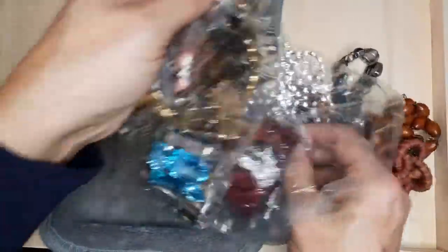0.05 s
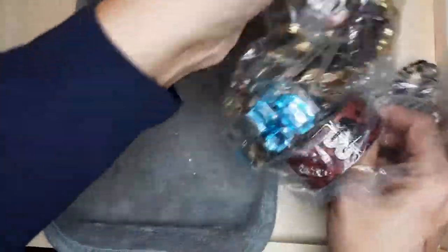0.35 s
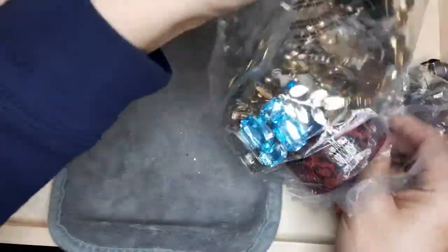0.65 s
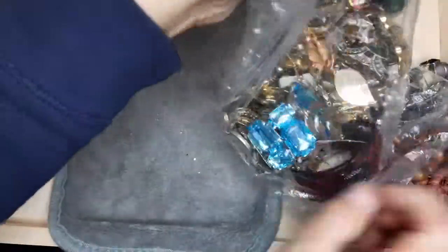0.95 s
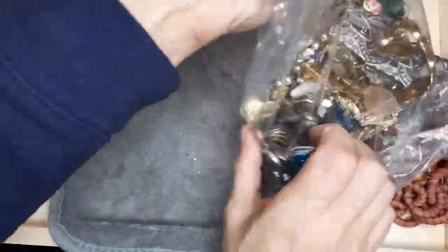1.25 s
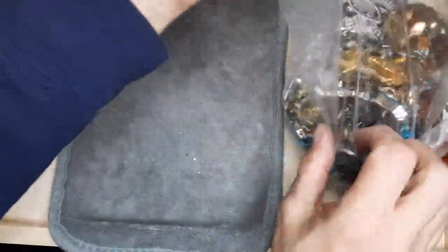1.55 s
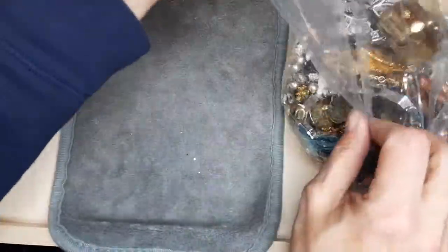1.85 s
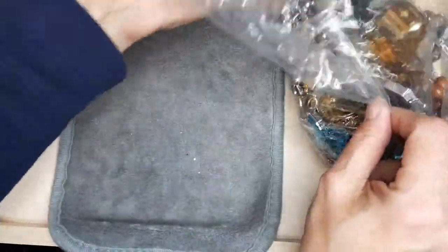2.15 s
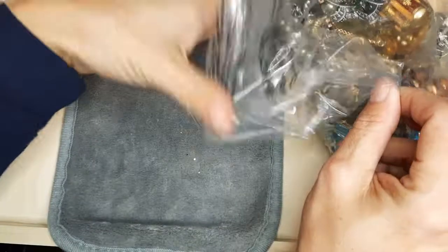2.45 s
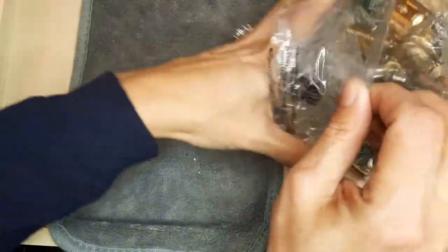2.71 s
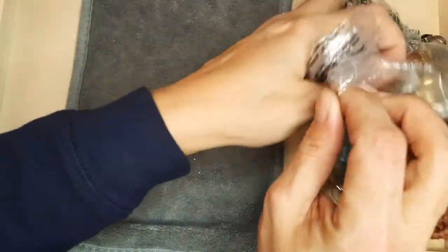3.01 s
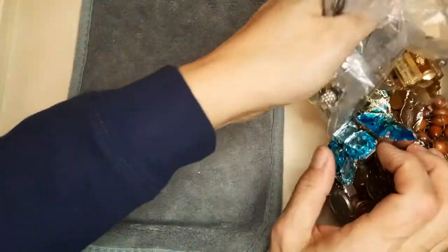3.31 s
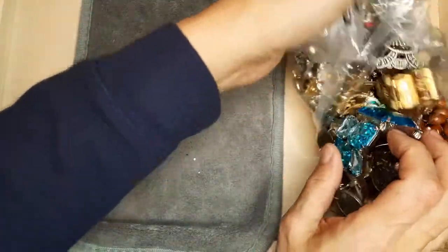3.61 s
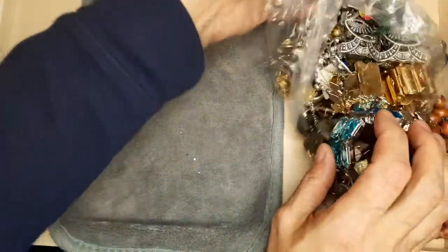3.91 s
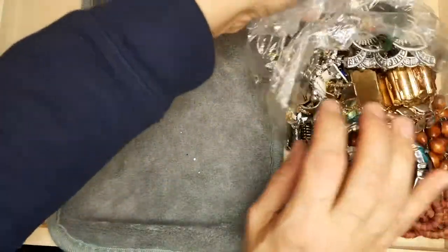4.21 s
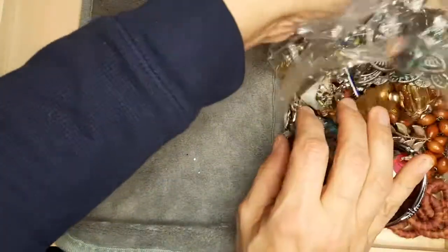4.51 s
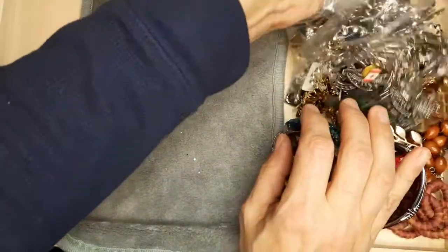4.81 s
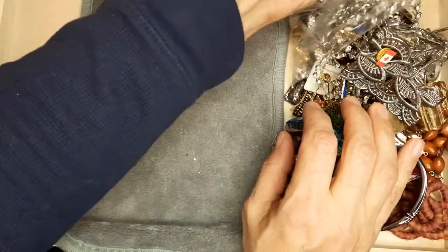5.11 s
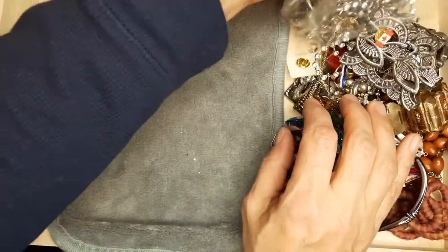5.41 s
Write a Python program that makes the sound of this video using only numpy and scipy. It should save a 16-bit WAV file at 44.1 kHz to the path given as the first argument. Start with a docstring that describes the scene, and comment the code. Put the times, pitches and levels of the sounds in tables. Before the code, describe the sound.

Costume jewellery is worked out of a thin plastic bag onto a wooden tray. The bag crinkles and snaps with each tug while beads and brooches grind and clack together. After a quieter stretch the crackling picks up, chains spill out with a fine, high jingle, and the heap settles with a louder clatter and dull knocks. The microphone is close, in a small, quiet room.

```python
"""In a small room, close to a phone, costume jewellery is worked out of a plastic bag onto a wooden tray.
Each tug buckles the thin plastic in many tiny spots, so it crinkles, and its creases snap.
Beads and brooches grind, rattle and clack against each other, and the tray answers with a dull knock.
Fine metal links ring high above the rest, and later on chains spill out and jingle."""
import sys
import numpy as np
from scipy import signal
from scipy.fft import rfft, irfft
from scipy.io import wavfile
from scipy.ndimage import uniform_filter1d

SR = 44100
rng = np.random.default_rng(int(sys.argv[2]) if len(sys.argv) > 2 else 0)


def transcribe(signal):
    """Save signal, clipped to [-1, 1], as a 16-bit WAV file at the path in sys.argv[1]."""
    frames = np.atleast_2d(signal).T
    limited = np.clip(frames, -1, 1)
    pcm = np.round(limited * 32767).astype(np.int16)
    wavfile.write(sys.argv[1], SR, pcm)


N = 245195

# A "ring time" (t60 in the code) is how long a sound takes to fade by 60 dB.
# the hush of the room: (pitch [Hz], level [dB])
AIR_TONE = [(20, -22), (45, -1), (68, -5), (120, -2.5), (300, -9.5), (1000, 0), (4000, -16.5),
            (15000, -53)]
# the heap settling on the table: (time [s], level [dB])
THUDS = [(.71, -55), (5.336, -47.5)]
# tugs at the bag: (start [s], length [s], crinkle [dB], grinding [dB], tray rumble [dB], sizzle [dB])
TUGS = [(-.12, 0.19, -40.5, -46, -52, -46), (0.05, .18, -40.5, -43, -54, -46.5),
        (0.236, 0.095, -38.5, -40.5, -49, -41.5), (0.285, 0.15, -44.5, -43.5, -52, -48),
        (0.593, 0.16, -38.5, -44, -50, -42.5), (0.795, 0.061, -51, -48, -60, -55),
        (0.93, 0.01, -44.5, -48.5, -58, -49), (0.51, 0.063, -51, -55.5, -64, -57),
        (1.008, 0.043, -49, -52, -56, -54), (1.111, 0.056, -41, -49, -55.5, -43.5),
        (1.215, 0.2, -46.5, -49.5, -56.5, -49), (1.481, 0.051, -43, -48, -76, -47),
        (1.682, 0.055, -49.5, -69, -84, -53), (1.565, 0.042, -50.5, -69, -73, -60),
        (1.76, .07, -55, -53, -69, -72), (1.934, 0.15, -43.5, -49, -53.5, -47.5),
        (2.105, 0.056, -48, -53.5, -57.5, -51.5), (2.29, 0.18, -51, -52, -60, -53.5),
        (2.67, .1, -55.5, -56, -59.5, -54.5), (2.58, 0.074, -51.5, -52, -55, -61),
        (2.764, 0.25, -43.5, -46, -52.5, -46.5), (3.043, 0.096, -45.5, -47, -56, -49),
        (3.268, 0.034, -51, -61, -81, -57), (3.37, .04, -52, -53, -72, -56),
        (3.439, 0.046, -45.5, -50.5, -59, -49.5), (3.475, 0.2, -45, -51, -55.5, -51),
        (3.721, 0.087, -47, -53, -55, -50.5), (3.817, 0.25, -44.5, -49, -52.5, -48.5),
        (4.07, 0.22, -50.5, -54, -57.5, -55), (4.358, 0.086, -43.5, -44, -52, -48.5),
        (4.446, 0.053, -39.5, -42, -49, -43.5), (4.523, 0.1, -46.5, -53, -52, -47.5),
        (4.636, 0.037, -46, -53, -58, -52), (4.682, 0.067, -50, -66, -74, -52),
        (4.973, 0.078, -52.5, -63, -62, -57), (4.626, 0.35, -45, -49, -54, -48.5),
        (5.077, 0.2, -49, -52, -51.5, -51.5), (5.274, 0.067, -35.5, -37, -41.5, -41.5),
        (5.404, 0.059, -53, -49, -61, -60)]
# tone of the tray, the heap, and the bag's crinkle, sizzle and sparkle: (pitch [Hz], level [dB])
TRAY_TONE = [(30, -32), (65, -5.5), (105, -10), (200, -4), (380, 1.5), (800, -2.5), (1100, 0), (1800, -40)]
HEAP_TONE = [(400, -22), (900, -6), (1300, -1.5), (2300, 3.5), (3300, 1), (4300, -6), (7000, -26),
             (15000, -43)]
CRINKLE_TONE = [(2000, -30.5), (3600, 1), (4400, 2.5), (5100, -2.5), (6200, -0.5), (7600, 0.5), (9000, 1),
                (10500, -9.5), (14000, -43.5)]
SIZZLE_TONE = [(6500, -28), (9000, -4.5), (10000, 1.5), (11200, 5.5), (12600, 3), (13800, -14),
               (15800, -33.5)]
SPARKLE_TONE = [(11000, -32), (13300, -1), (14300, 7), (15000, -5), (15800, -1)]
# pitches that stand out in the rustle and hits, low woody ones and two bright bands:
# (pitch [Hz], width [Hz], level [dB])
STANDOUT_PITCHES = [(180, 34, -9), (300, 20, -19), (409, 11, -16), (793, 94, -11), (1270, 170, -10.5),
                    (1836, 58, -9), (2520, 990, -20.5), (3330, 250, -12.5), (6120, 1000, -8),
                    (11000, 880, -21)]
# pieces chattering as they slide: (start [s], length [s], pitch [Hz], level [dB], pitch spread [share])
RATTLES = [(0.35, 0.037, 2470, -37.5, 0.22), (0.404, .015, 1396, -35, 0.28), (.49, 0.07, 11400, -55, 0.017),
           (0.709, 0.033, 4550, -37.5, 0.073), (1.322, 0.036, 11300, -47.5, .01),
           (1.49, 0.051, 11400, -49, 0.0082), (2.085, 0.045, 12160, -57, .008),
           (1.51, 0.055, 4630, -47.5, 0.14), (1.968, 0.11, 4460, -49, 0.114),
           (2.081, 0.094, 4270, -47, 0.126), (3.07, .1, 6150, -47.5, 0.03), (3.59, .006, 4720, -45, .1),
           (3.651, .003, 5000, -41, 0.047), (3.709, .007, 4850, -39, 0.13), (4.037, 0.04, 915, -42, 0.4),
           (4.033, 0.048, 8800, -48, .07), (4.154, 0.23, 1140, -49, 0.32), (4.353, 0.02, 6120, -43, 0.047),
           (4.478, 0.026, 8850, -40, .06), (4.87, 0.04, 12300, -45, 0.056), (4.922, .018, 12200, -41, .03)]
# small metal parts ringing freely: (time [s], pitch [Hz], level [dB], ring time [s])
TINKLES = [(0.837, 5930, -27, 0.044), (1.632, 10780, -42.5, 0.14), (3.073, 10790, -37.5, 0.2),
           (3.217, 12970, -60, .1), (3.65, 11400, -41, 0.06), (3.694, 12900, -50, .04),
           (3.832, 11400, -53, .04), (3.876, 12600, -49, .045), (4.153, 12930, -52, 0.24),
           (4.201, 12950, -51, 0.18), (4.205, 13570, -50, 0.1), (4.32, 13350, -50, .07),
           (4.526, 12300, -41, 0.033), (4.56, 12970, -46, .14), (4.965, 12960, -40, .2),
           (5.15, 13587, -51, .2), (5.205, 8950, -46, 0.038), (5.2365, 12990, -41, 0.19),
           (5.289, 12960, -52, .15), (5.319, 10600, -46, 0.037), (5.345, 9170, -39, 0.052),
           (5.35, 9140, -37, 0.054), (5.36, 9150, -39, .08), (5.405, 9100, -36.5, 0.067)]
# the notes in one hard, bright snap: (pitch [Hz], level [dB], ring time [s])
SNAP_NOTES = [(2300, -26.5, 0.0056), (5000, -27, 0.0055), (7050, -19.5, 0.011), (7860, -6.5, 0.0047),
              (8400, -13, 0.0032), (11230, -24, 0.0055)]
# creases of the bag giving way: (time [s], length [s], level [dB], brightness [dB])
CREASES = [(0.028, 0.0033, -34.5, 7), (0.243, .005, -39, -6), (0.289, .004, -28, -1),
           (.299, 0.0028, -33.5, 0), (0.331, .011, -31.5, -2.5), (.351, 0.013, -34.5, -7),
           (0.439, 0.0026, -28, 0), (0.456, 0.0038, -36.5, -8.5), (0.543, 0.0032, -46, 3),
           (.68, 0.0074, -40, 7), (0.7366, 0.0034, -36, -3), (0.758, .002, -33.5, 0),
           (0.779, 0.0032, -35, 9), (0.7953, 0.0027, -28, 1.5), (0.8, 0.0027, -33, -0.5),
           (0.8387, 0.0027, -31.5, -3), (0.852, .006, -32, 0), (.863, .002, -35, -1),
           (1.1453, 0.0038, -44, -7), (1.1825, 0.0043, -41, -3), (1.72, .006, -51.5, -6),
           (1.7975, .002, -52, -5), (1.9717, 0.0037, -46, 0), (2.069, 0.0033, -46, 0),
           (2.09, 0.0039, -40, -1), (2.218, 0.0031, -49, -5), (2.336, 0.0058, -46, -1),
           (2.6382, .009, -44.5, 0), (2.8387, .003, -49, 2), (2.911, 0.0067, -34, -0.5),
           (2.924, 0.0034, -41, -2), (2.969, 0.021, -37, -2), (2.992, 0.0028, -31, -2),
           (3.004, 0.0061, -36, 3), (3.011, 0.0077, -34, -1.5), (3.053, 0.0077, -34, -3),
           (3.083, 0.0062, -33, 5), (3.1054, .011, -35.5, 4), (3.143, .008, -36.5, 2.5),
           (3.1555, 0.0031, -34, 1.5), (3.163, .006, -42, -1), (3.593, .003, -41.5, -1),
           (3.651, .002, -40, -2), (3.67, 0.0035, -49, 0), (3.7115, 0.0042, -34.5, -1),
           (3.716, 0.0038, -39.5, -2.5), (3.725, .005, -37, -1), (3.802, .004, -41.5, -2),
           (4.3594, 0.0042, -37, -1.5), (4.406, 0.0045, -34.5, -1), (4.4567, .004, -35.5, -4),
           (4.4967, .003, -34, -1.5), (4.642, .005, -43, 1), (4.792, .004, -42.5, 2),
           (4.8502, 0.0035, -30.5, -1.5), (4.8861, .005, -32.5, -1.5), (4.9152, 0.0043, -39, -6),
           (5.5283, 0.0033, -46, 4)]
# the hardest hits between pieces; knock and crack are relative to the level:
# (time [s], main pitch [Hz], level [dB], tray knock [dB], crack [dB])
CLACKS = [(0.2994, 2200, -31.5, -19, -4), (0.3557, 2490, -40, -17, -5), (0.7901, 2330, -29, -20, 1.5),
          (0.7954, 2240, -27.5, -21, 0), (0.812, 1900, -33, -16, -11), (1.262, 2380, -43, -24, -7),
          (1.3265, 3030, -36, -15, -3), (1.5044, 4200, -46.5, -5.5, -13), (1.768, 1780, -40.5, -16, -18),
          (1.8258, 2370, -33, -16.5, -12), (2.015, 4400, -54, -14, -3), (2.0466, 4300, -45.5, -1, -13),
          (2.142, 4050, -37, -30, -9), (3.288, 3120, -42.5, -28, -13), (3.297, 4380, -45, -25, -15),
          (3.3183, 3100, -53, -7, 6), (3.3626, 3300, -29, -27, -8), (3.387, 3000, -51, -22, -14),
          (3.5671, 2360, -41, -23, -3), (3.9645, 2310, -38.5, 0, -13), (3.9768, 3000, -47, -6, -13),
          (3.991, 3000, -46, -2, -5), (4.026, 2570, -28, -6.5, -3.5), (4.0615, 2280, -40, -6, -14),
          (4.0845, 2310, -37, 0.5, -10), (4.092, 1300, -43, 1.5, -14), (4.1, 1900, -49, 0, -7),
          (4.115, 1500, -47, 0, -9), (4.2068, 1280, -44.5, -12, -0.5), (4.3192, 1480, -50, -3, -8),
          (4.4997, 2100, -35, -14, -5), (4.562, 4900, -40.5, -21, 1), (4.755, 1900, -44, -6.5, -8),
          (4.8074, 4420, -36.5, -33, -3), (4.954, 3400, -28, -23, -5), (5.152, 3240, -45.5, -10, -17),
          (5.187, 3180, -43.5, 1.5, -20), (5.223, 3450, -39.5, -15, -9), (5.2547, 3430, -27.5, -14, -24),
          (5.258, 2280, -25, -7, -9.5), (5.2886, 3380, -24.5, -11, -7.5), (5.3015, 3060, -42, -8, -10),
          (5.3273, 3000, -33, -15, -3), (5.3328, 4200, -31.5, -12, -4), (5.3349, 2350, -22.5, -8.5, -13),
          (5.3428, 3630, -28, -13, -12), (5.3468, 2350, -33, -12, -7), (5.356, 3300, -33, -10, -2),
          (5.369, 3450, -35.5, -10, -9), (5.3758, 2320, -37, -14, -14), (5.3852, 2240, -39, -21, -16),
          (5.401, 3380, -32, -19, -17), (5.414, 3280, -37, -23, -12), (5.4295, 3540, -32, -28, -12),
          (5.441, 2900, -36.5, -22, -2), (5.5043, 3220, -38, -28, -15)]

# pitch ranges of the parts of a hit: (lowest [Hz], highest [Hz])
KNOCK_BAND, TRAY_RING_BAND, BODY_BAND = (350, 1300), (480, 1150), (1400, 4400)
CRACK_BAND, SIZZLE_BAND, SPARKLE_BAND = (4300, 8800), (9100, 13800), (13500, 15600)


def gain(db):
    """Turn decibels into a number to multiply by."""
    return 10 ** (np.asarray(db) / 20)


def unit(x):
    """Scale a sound to an average strength (rms) of 1."""
    return x / np.sqrt(np.mean(x ** 2))


def at_level(x, db, spread_s=.004):
    """Scale a short sound so that its energy, spread over spread_s, has this level."""
    return x * gain(db) * np.sqrt(spread_s * SR / np.sum(x ** 2))


def add(out, start, x):
    """Mix x into out from a start time in seconds."""
    i = max(int(start * SR), 0)
    out[i:i + len(x)] += x[:max(len(out) - i, 0)]


def fade_in(x, rise_s):
    """Soften the start of a sound."""
    return x * np.minimum(np.arange(len(x)) / SR / rise_s, 1)


def bandpass(x, band, order):
    """Keep one range of pitches; a higher order cuts more sharply."""
    return signal.sosfilt(signal.butter(order, band, "bandpass", fs=SR, output="sos"), x)


def colour(x, tone, size=2048):
    """Filter a sound so that it follows a tone table."""
    hz, db = np.transpose(tone)
    grid = np.maximum(np.arange(size // 2 + 1) * SR / size, 1)
    curve = gain(np.interp(np.log(grid), np.log(hz), db))
    # folding the cepstrum makes the filter ring only after a click, never before it
    cepstrum = irfft(np.log(curve))
    cepstrum[1:size // 2] *= 2
    cepstrum[size // 2 + 1:] = 0
    return signal.fftconvolve(x, irfft(np.exp(rfft(cepstrum))))[:len(x)]


def ring(hz, t60, size=1500):
    """One fading note (or one for each pitch in a column)."""
    t = np.arange(size) / SR
    return np.sin(2 * np.pi * hz * t) * np.exp(-np.log(1000) * t / t60)


def cluster(band, t60, count=9, size=1500):
    """An uneven piece rings with many close notes at once."""
    hz = band[0] + (band[1] - band[0]) * (np.arange(count) + rng.random(count)) / count
    notes = rng.choice([-1, 1], count) @ ring(hz[:, None], t60, size)
    return bandpass(notes, band, 3)


def wander(rate):
    """Glide to a new random value, rate times a second."""
    step = max(int(SR / rate), 1)
    held = rng.standard_normal(N)[np.arange(N) // step]
    return np.sqrt(3 / 2) * uniform_filter1d(held, step)


def grains(rate, spread_db):
    """Tiny random clicks, about rate a second: many faint, a few strong."""
    strength = gain(spread_db * np.minimum(rng.exponential(size=N), 4))
    return unit((rng.random(N) < rate / SR) * strength * rng.choice([-1, 1], N))


def pings(low_hz, high_hz, rate, t60, spread_db):
    """A stream of tiny hits, each with its own pitch, strength and ring time."""
    out = np.zeros(N)
    for when, pitch, softness, hold in rng.random((int(rate * N / SR), 4)):
        strength = gain(-spread_db * np.log(max(softness, .04)))
        note = ring(low_hz * (high_hz / low_hz) ** pitch, t60 * (.5 + hold), size=1000)
        add(out, when * N / SR, strength * note)
    return unit(bandpass(out, (.9 * low_hz, 1.1 * high_hz), 2))


def air(level_db=-63.5):
    """The faint, steady hush of a still room."""
    return gain(level_db) * unit(colour(rng.standard_normal(N), AIR_TONE))


def room_echo(x, level_db=-10.5, low_t60=.25, treble_t60=.22, onset_s=.00061):
    """Sound bounces off the table and walls; the treble dies a little sooner."""
    t = np.arange(SR // 2) / SR
    noise = rng.standard_normal(len(t))
    low = signal.sosfiltfilt(signal.butter(2, 5000, fs=SR, output="sos"), noise)
    tail = low * gain(-60 * t / low_t60) + .82 * (noise - low) * gain(-60 * t / treble_t60)
    tail *= np.clip(t / onset_s - .5, 0, 1)
    return gain(level_db) * signal.fftconvolve(x, tail / np.sqrt(np.sum(tail ** 2)))[:N]


def thuds():
    """The table gives softly under the settling heap."""
    out = np.zeros(N)
    boom = fade_in(ring(hz=71.5, t60=.22, size=SR // 3), rise_s=.016)
    for start, db in THUDS:
        add(out, start, gain(db) * boom)
    return out


def boost_pitches(x):
    """Make a few pitches stand out: low, woody ones and two bright bands."""
    peaks = sum(gain(db) * signal.lfilter(*signal.iirpeak(hz, hz / width, SR), x)
                for hz, width, db in STANDOUT_PITCHES)
    return .89 * (x + peaks)


def handling(grip_share=.4, swell_db=7.5, release_db_per_s=115.5):
    """Crinkle, grinding, rumble and sizzle over time, in dB: each tug grips, builds and lets go."""
    t = np.arange(N) / SR
    resting_db = [[-57.5], [-60], [-66.5], [-60.5]]  # the hands never hold quite still
    power = gain(resting_db) ** 2 * np.ones(N)
    for start, length, *levels_db in TUGS:
        age = t - start
        grip = np.clip(age / (grip_share * length), 0, 1)
        build_db = -swell_db * np.clip(1 - age / length, 0, 1)
        release_db = -release_db_per_s * np.maximum(age - length, 0)
        power += np.outer(gain(levels_db), grip * gain(build_db + release_db)) ** 2
    # a knock on the tray briefly sets the heap grinding
    jostle = gain(-6 - 208 * t[:SR // 2])
    for start, _, db, knock_db, _ in CLACKS:
        add(power[1], start, (gain(db + knock_db) * jostle) ** 2)
    return 10 * np.log10(power)


def rustle(crackle_from_db=-53, sparkle_from_db=-49, spill_s=3.5):
    """Sliding pieces and buckling plastic shed countless clicks as the load slips in fits and starts."""
    crinkle_db, grind_db, rumble_db, sizzle_db = handling()
    slip = wander(rate=130)
    buckles = grains(rate=2600, spread_db=2)
    contacts = grains(rate=2000, spread_db=2.5)
    beads = pings(989, 4170, rate=260, t60=.026, spread_db=2)
    clasps = pings(4010, 9400, rate=380, t60=.0057, spread_db=1.5)
    links = pings(8830, 13600, rate=300, t60=.01, spread_db=5.5)
    crinkle = unit(unit(colour(buckles, CRINKLE_TONE)) + .6 * clasps)
    crinkle *= gain(crinkle_db + slip - 1.62)
    # slack plastic rustles evenly, tight plastic crackles
    tightness = (2 + np.tanh((sizzle_db - crackle_from_db) / 3)) / 2
    crackle = grains(rate=2600, spread_db=6)
    fizz = unit(colour(buckles + .47 * tightness * crackle, SIZZLE_TONE))
    sizzle = unit(fizz + .3 * tightness * links) * gain(sizzle_db + 1.9 * slip - 3.5)
    # every contact in the heap also shakes the tray
    scrape = unit(colour(contacts + .47 * buckles, HEAP_TONE))
    grind = unit(scrape + .6 * beads) * gain(grind_db + 1.1 * slip - .5)
    bumps = contacts + .64 * grains(rate=1500, spread_db=3)
    rumble = unit(colour(bumps, TRAY_TONE)) * gain(rumble_db + slip + 1)
    # the highest sparkle fades away faster than the rest when the rustle is quiet
    fade_db = 1.4 * np.minimum(sizzle_db - sparkle_from_db, 0)
    glints = buckles + grains(rate=2600, spread_db=3) / 2
    sparkle = unit(colour(glints, SPARKLE_TONE)) * gain(sizzle_db + fade_db + 2.4 * slip - 11.5)
    # chains jingle once they spill out of the bag
    spilled = np.arange(N) / SR > spill_s
    chains = pings(8000, 14300, rate=450, t60=.014, spread_db=6.5) * gain(sizzle_db - 6) * spilled
    return crinkle + sizzle + sparkle + chains + grind + rumble


def rattles(hits_per_s=260, t60=.021):
    """A sliding piece is struck again and again, never quite at the same spot."""
    out = np.zeros(N)
    for start, length, hz, db, spread in RATTLES:
        count = int(hits_per_s * length) + 1
        for k, (when, pitch, strength) in enumerate(rng.random((count, 3))):
            tick = (.5 + strength) * ring(hz * (1 + spread * (2 * pitch - 1)), t60)
            tick = fade_in(tick, rise_s=3 / hz)  # a glancing touch swells over a few cycles
            add(out, start + length * (k + when) / count, 2 * gain(db) * tick)
    return out


def tinkles(beat_hz=70):
    """Links and rings tick, then sound a high note that wavers because they are not quite round."""
    out = np.zeros(N)
    for start, hz, db, t60 in TINKLES:
        note = ring(hz, t60, size=SR // 3) + gain(-8) * ring(hz + beat_hz, t60, size=SR // 3)
        add(out, start, gain(db + 3) * fade_in(note, rise_s=.00069))
        add(out, start, at_level(cluster(SIZZLE_BAND, t60=.006), db - 8))
    return out


def snap(start_s=.9435, rise_s=.0003):
    """One small hard piece flicks against another right under the microphone."""
    out = np.zeros(N)
    notes = sum(gain(db) * ring(hz, t60) for hz, db, t60 in SNAP_NOTES)
    t = np.arange(len(notes)) / SR
    onset = 1 - np.exp(-(t / rise_s) ** 2)
    add(out, start_s, gain(4.5) * notes * onset)
    return out


def creases(buckles_per_s=2200, patch_hz=6780):
    """A crease gives way in a run of buckles that ring the plastic: short runs snap, long ones rasp."""
    out = np.zeros(N)
    for start, length, db, bright_db in CREASES:
        run = np.zeros(SR // 20)
        count = int(buckles_per_s * length) + 1
        for k, (when, strength, side) in enumerate(rng.random((count, 3))):
            click = (.5 + strength) * np.sign(side - .5)
            add(run, length * (k + when) / count, np.array([click]))
        parts = ((BODY_BAND, -7 - bright_db), (CRACK_BAND, 0),
                 (SIZZLE_BAND, bright_db - 1.5), (SPARKLE_BAND, bright_db - 21))
        pop = sum(at_level(signal.fftconvolve(run, cluster(band, t60=.003, count=16)), part_db)
                  for band, part_db in parts)
        # one flat patch of plastic adds its own note, higher for a brighter crease
        hz = patch_hz * np.sqrt(gain(bright_db)) * 2 ** (rng.random() - .5)
        patch = signal.fftconvolve(run, ring(hz, t60=.0059))
        add(out, start, at_level(pop + at_level(patch, -8), db + 1))
    return out


def clacks(t60=.007, contact_top_hz=6300):
    """Beads and brooches collide: a sharp click, notes the heap smothers, and a short ring of the tray."""
    out = np.zeros(N)
    for start, hz, db, knock_db, crack_db in CLACKS:
        low_hz, high_hz = hz / 1.69, hz * 1.43
        notes = cluster((low_hz, high_hz), t60, count=12)
        contact = bandpass(signal.unit_impulse(len(notes)), (low_hz, contact_top_hz), 4)
        body = at_level(notes, 0) + at_level(ring(hz, t60=.005), -7) + at_level(contact, -9)
        knock = at_level(cluster(KNOCK_BAND, t60=.009), knock_db)
        crack = at_level(cluster(CRACK_BAND, .41 * t60), crack_db)
        sizzle = at_level(cluster(SIZZLE_BAND, .7 * t60), crack_db - 13)
        add(out, start, gain(db - 1.5) * (at_level(body, 0) + knock + crack + sizzle))
        tray_ring = cluster(TRAY_RING_BAND, t60=.083, count=14, size=4096)
        add(out, start, at_level(tray_ring, db + knock_db - 4))
    return out


def scene():
    """Bag and jewellery in the room; the sharp hits echo most, the high tinkles least."""
    sliding = boost_pitches(rustle()) + rattles()
    hits = boost_pitches(clacks() + creases())
    flick, metal = snap(), tinkles()
    echo = room_echo(gain(-3.5) * sliding + gain(6) * hits + gain(3) * flick + gain(-10) * metal)
    return (air() + echo + thuds() + sliding + metal + flick + hits)[None]


def record(dry):
    """The phone cuts the deepest bass (below 46 Hz) and the highest treble (above 15700 Hz)."""
    dry = signal.sosfilt(signal.butter(3, 46, "highpass", fs=SR, output="sos"), dry)
    return signal.sosfilt(signal.ellip(10, .2, 80, 15700, fs=SR, output="sos"), dry)


dry = scene()
out = record(dry)
transcribe(out)
```